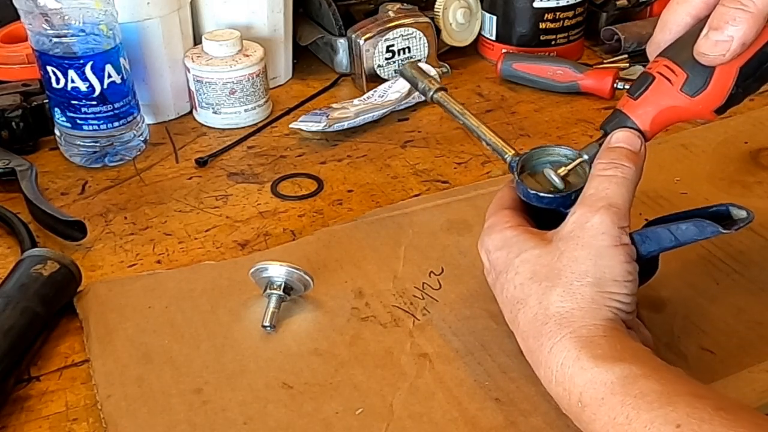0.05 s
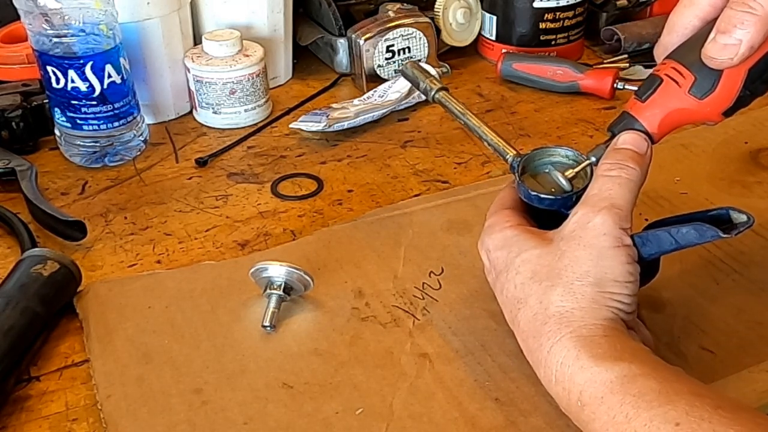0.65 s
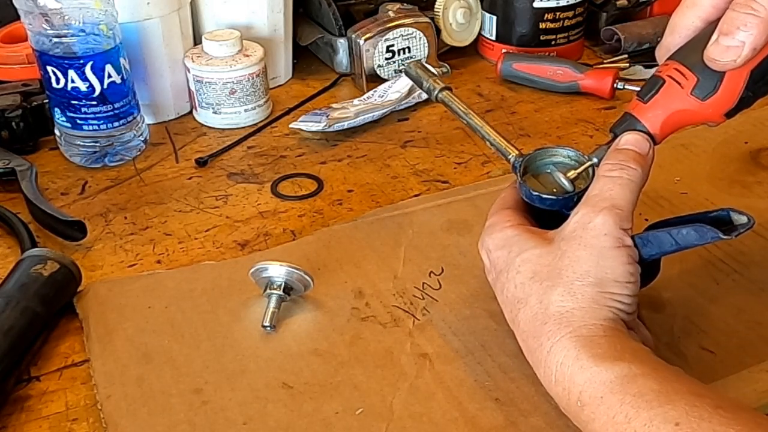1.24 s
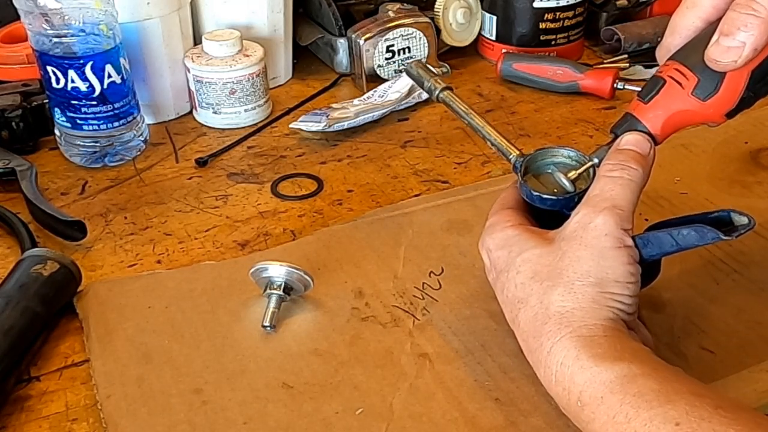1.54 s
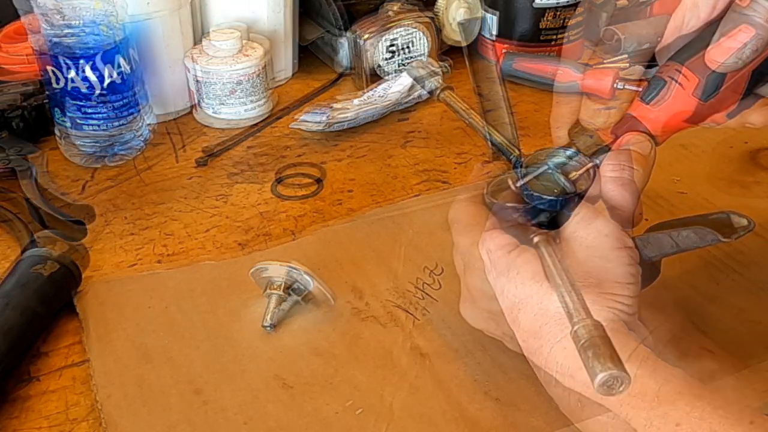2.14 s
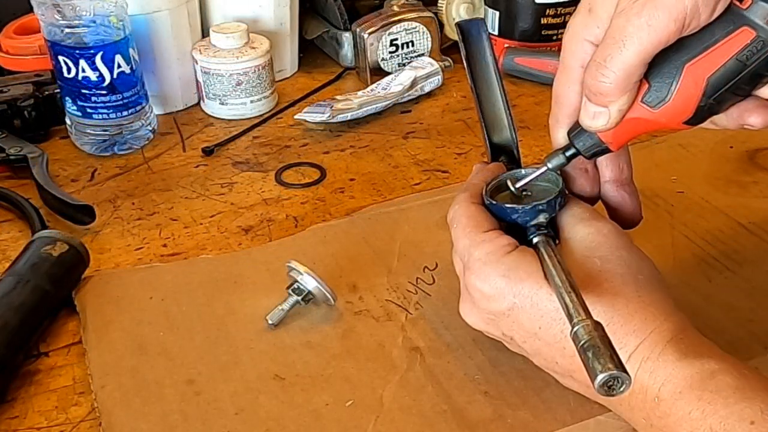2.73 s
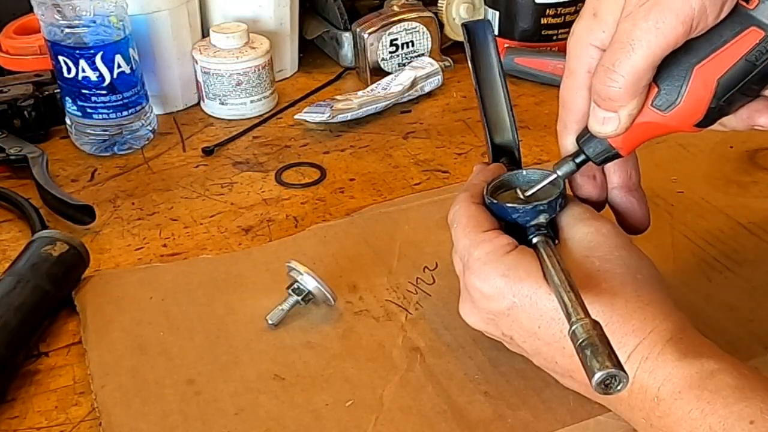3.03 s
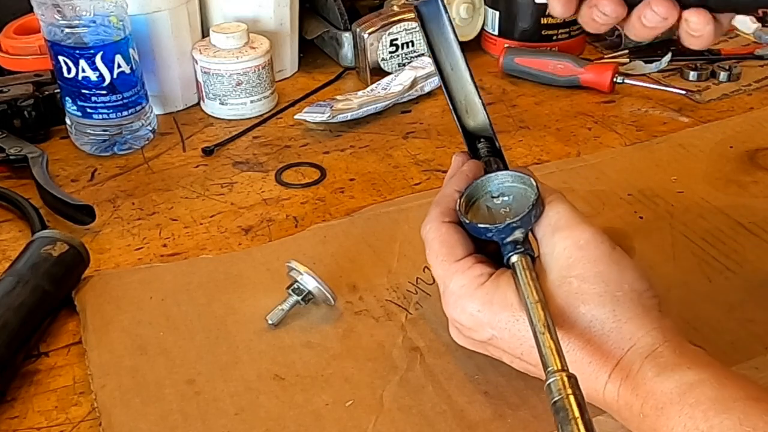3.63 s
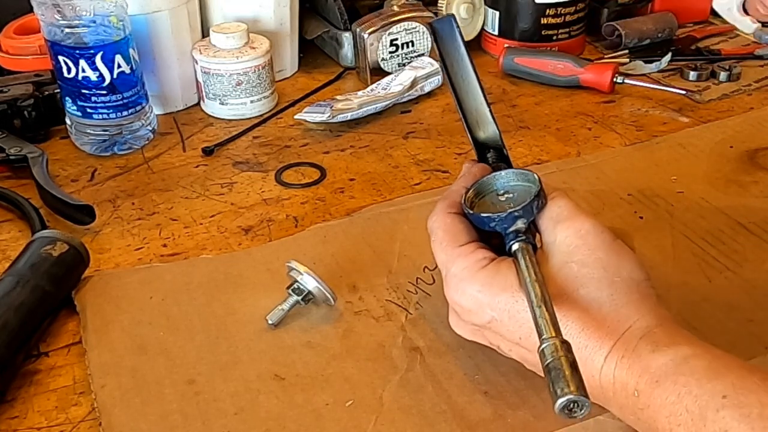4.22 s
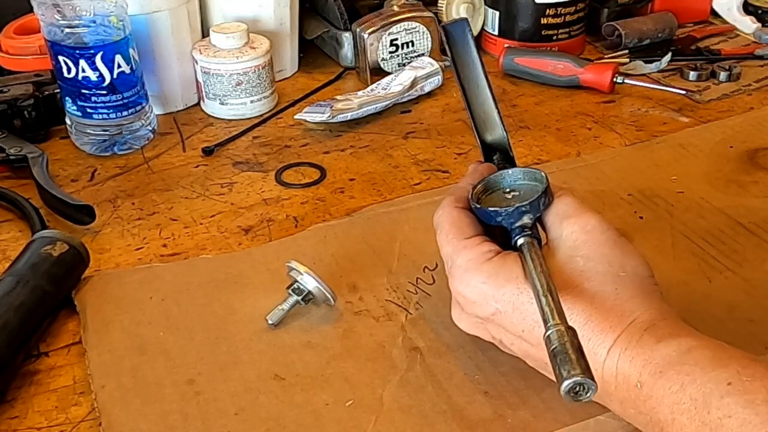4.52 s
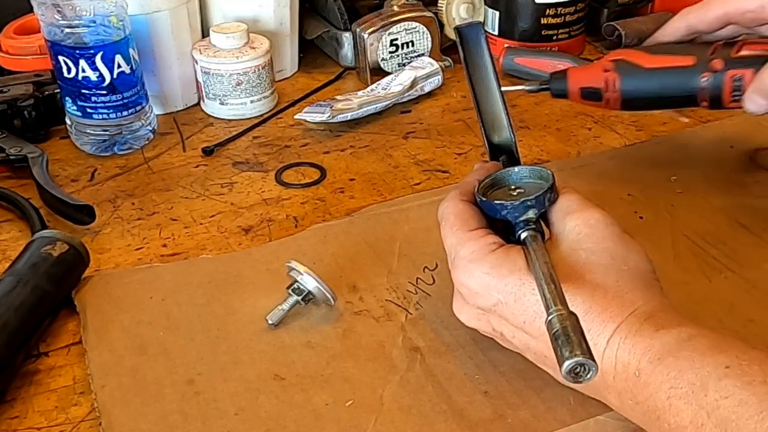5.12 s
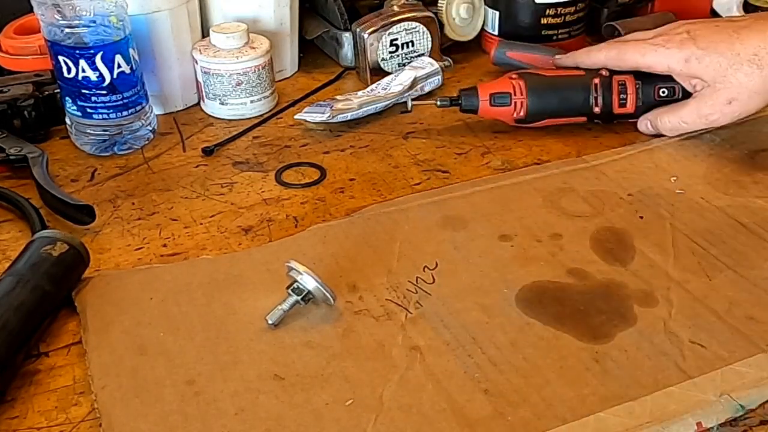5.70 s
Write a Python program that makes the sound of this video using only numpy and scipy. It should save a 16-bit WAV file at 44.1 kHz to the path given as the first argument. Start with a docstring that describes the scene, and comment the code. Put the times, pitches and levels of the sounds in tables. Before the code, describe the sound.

Close by in a quiet workshop, a small rotary tool grinds steel with a gritty, chattering buzz that sags under pressure and squeals against the rim. After about three seconds the grinding stops and the freed motor rises to a high whine. It clicks off and coasts down, then is set on a wooden bench with sharp clacks and a hollow knock, followed by a last brief rasp.

```python
"""A cordless rotary tool skids with a screech, then grinds inside a small steel cup: one blow a turn and
dragged grit excite the cup's modes, and the speed sags under load. This pass fades into a second, in
which the rim squeals. The bit catches and lifts off; the freed motor races up with a whine, is switched
off and coasts down against drag and friction. The tool is put down, its plastic shell clacking and the
wooden workbench ringing, and a last short rasp of grinding sets in."""
import sys
import numpy as np
from scipy import signal
from scipy.fft import rfft, irfft, next_fast_len
from scipy.io import wavfile
from scipy.ndimage import uniform_filter1d, minimum_filter1d

SR = 44100
rng = np.random.default_rng(int(sys.argv[2]) if len(sys.argv) > 2 else 0)


def pcm_store(signal):
    """Save signal as 16-bit PCM."""
    levels = np.round(np.clip(np.atleast_2d(signal), -1, 1) * 32767)
    wavfile.write(sys.argv[1], SR, levels.astype(np.int16).T)


N = 262641
TIME = np.arange(N) / SR
PADDED = next_fast_len(N + 16384, real=True)
BINS = np.maximum(np.arange(PADDED // 2 + 1) * SR / PADDED, 1)  # Hz

SKID_END_S, SKID_BLUR_DB = 0.188, 6  # skidding blurs the blows and the motor's tone
HANDOVER_S, HANDOVER_LENGTH_S = 1.68, 0.88  # the first pass fades into the second
FREE_S, OFF_S = 3.3, 4.95  # the motor is freed of its load, then switched off
TOP_SPEED = 271.4  # turns per second

# The first pass sags as the hand bears down. Each row: time in seconds, speed in turns per second.
FIRST_SPEED = [(0, 244), (.19, 236.3), (.37, 243), (.6, 234), (.77, 219), (.95, 207), (1.42, 195),
               (1.7, 182.8), (2.25, 170)]
# Spectrum of a small click, of rim or switch. Each row: frequency in Hz, relative level in dB.
CLICK_COLOUR = [(400, -41), (1300, -10.5), (2100, -9.5), (4500, -13), (6000, -27), (14000, -44)]
# Resonances of the housing. Each row: frequency in Hz, width in Hz, lift in dB.
HOUSING = [(277, 43, 13.5), (1170, 72, 23), (1600, 170, 8.5), (5430, 770, 15), (7770, 610, 14.5),
           (8550, 160, 26)]
# The tool meets the bench. Each row: time in seconds, relative levels of clack and thud in dB,
# pitch of the clack in Hz, relative level of the crack in dB.
KNOCKS = [(5.498, -6.5, -22, 3500, -34), (5.5003, -2, -19.5, 1000, -32), (5.519, -34, -15, 600, -44),
          (5.5485, -13, -18, 2300, -21), (5.5506, -6, -7, 2270, -10.5), (5.6143, -15, -16.5, 800, -50),
          (5.6241, -6.5, -2, 3120, -21), (5.639, -27, -13, 1200, -50), (5.662, -18, -10.5, 1500, -50)]


def from_db(db):
    """Decibels to amplitude ratio."""
    return 10 ** (np.asarray(db) / 20)


def rms_one(x):
    """Scale so that the mean of the channels has rms 1."""
    return x / np.sqrt(np.mean(np.atleast_2d(x).mean(axis=0) ** 2) + 1e-20)


def in_time(points):
    """Linear interpolation of a curve at every sample."""
    return np.interp(TIME, *np.transpose(points))


def at_bins(points):
    """Interpolation over log frequency at every bin."""
    hz, value = np.transpose(points)
    return np.interp(np.log(BINS), np.log(hz), value)


def ramp(start, length):
    """A linear rise from 0 to 1."""
    return np.clip((TIME - start) / length, 0, 1)


def bump(centre, half_width):
    """A Gaussian swell to 1 and back."""
    return np.exp(-((TIME - centre) / half_width) ** 2)


def drift(rate_hz):
    """Slow random fluctuation: low-passed noise with rms 1."""
    pole = np.exp(-80 * np.pi * rate_hz / SR)
    slow = signal.lfilter([1], [1, -2 * pole, pole * pole], rng.standard_normal(N // 40 + 2002))[2000:]
    return np.interp(np.arange(N) / 40, np.arange(len(slow)), rms_one(slow))


def filtered(x, response):
    """Linear filtering: multiply the spectrum by a frequency response."""
    return irfft(rfft(x, PADDED) * response, PADDED)[..., :N]


def causal(spectrum):
    """The minimum-phase response of a body with this spectrum: it rings only after the blow."""
    cepstrum = irfft(np.log(from_db(at_bins(spectrum))), PADDED)
    cepstrum[1:PADDED // 2] *= 2
    cepstrum[PADDED // 2 + 1:] = 0
    return np.exp(rfft(cepstrum))


def resonator(hz, width):
    """Frequency response of one damped mode."""
    return 1 / (1 + 2j * (BINS - hz) / width)


def lift_db(resonances, hz):
    """Lorentzian peaks: how much a set of resonances raises this frequency."""
    return sum(db / (1 + (2 * (hz - centre) / width) ** 2) for centre, width, db in resonances)


def scatter(t60):
    """Response of a diffuse tail: noise in exponential decay, with unit energy."""
    tail = rng.standard_normal(N) * from_db(-60 * np.minimum(TIME / t60, 2))
    return rfft(tail / np.linalg.norm(tail), PADDED)


def clicks(times, sizes):
    """Impulses, each shared between its two nearest samples."""
    at = np.clip(np.asarray(times) * SR, 0, N - 2)
    whole = at.astype(int)
    fraction = at - whole
    return np.bincount(whole, sizes * (1 - fraction), N) + np.bincount(whole + 1, sizes * fraction, N)


def noise(spectrum):
    """Coloured noise with rms 1."""
    return rms_one(filtered(rng.standard_normal(N), from_db(at_bins(spectrum))))


def workshop():
    """Background noise: a low rumble, which dips for a while, and a steady hiss."""
    # Spectra of the quiet room. Each row: frequency in Hz, relative level in dB.
    rumble_colour = [(20, -28), (42, 8.5), (90, -1.5), (160, -27), (300, -12.5), (600, -68)]
    hiss_colour = [(150, -10), (600, -23), (1260, -8.5), (2400, -16.5), (14000, -50)]
    rumble = noise(rumble_colour) * from_db(-38.5 - 7.5 * bump(2.6, 1))
    return rumble + noise(hiss_colour) * from_db(-44.5)


def skid():
    """1 while the bit skids, then 0."""
    return 1 - ramp(SKID_END_S, 0.029)


def load():
    """Load slows a motor: 0 at the highest speed of the first pass, 1 at its lowest."""
    speed = in_time(FIRST_SPEED)
    return (speed.max() - speed) / np.ptp(speed)


def screech():
    """Stick-slip friction drives the rim's high modes in uneven bursts that grow until the bit grips."""
    # High modes of the rim. Each row: frequency in Hz, width in Hz, level at the skid's end in dB.
    rim_modes = [(6840, 470, -23), (8150, 550, -19.5), (11200, 260, -31)]
    rise_db_per_s = 44
    hiss_band = 1 / (1 + (5000 / BINS) ** 8) / (1 + (BINS / 12000) ** 4)
    out = rms_one(filtered(rng.standard_normal(N), hiss_band)) * from_db(-30 + 1.8 * drift(45))
    for hz, width, db in rim_modes:
        mode = rms_one(filtered(rng.standard_normal(N), resonator(hz, width) ** 2))
        out = out + mode * from_db(db + 2.6 * drift(38))
    return out * skid() * from_db(rise_db_per_s * np.minimum(TIME - SKID_END_S, 0))


def grinding_pass(speed, blow_colour, grit_colour, blows_over_grit_db, bounce,
                  jitter_s, uneven, gating_db, smear, spot_size, spots=6):
    """Periodic impact: the bit strikes the cup once a turn and drags grit over it after each blow."""
    # High modes of the cup, rung by the grit. Each row: frequency in Hz, width in Hz, lift in dB.
    cup_modes = [(3880, 140, 3.5), (4750, 450, 4), (8470, 230, 11), (9430, 92, 10)]
    turns = np.cumsum(in_time(speed) * (1 + 0.0012 * drift(18.4))) / SR
    k = np.arange(1, int(turns[-1]))
    blow_times = np.interp(k, turns, TIME)
    # period doubling: a bouncing bit lands hard and soft in turn
    sizes = 1 + np.interp(blow_times, TIME, bounce) * (-1) ** k
    sizes *= 1 + uneven * rng.standard_normal(len(k))
    late = jitter_s * rng.standard_normal(len(k))
    blows = clicks(blow_times + late, sizes)
    # smaller high spots round the bit touch at their own, wandering angles: uneven overtones
    for offset in rng.random(spots):
        wander = .003 * np.interp(k, turns, drift(3.4))
        spot_times = np.interp(k + offset + wander, turns, TIME)
        blows = blows + spot_size * drift(2.5) * clicks(spot_times + late, sizes)
    # bending waves in steel are dispersive: the lows arrive later
    dispersion = np.exp(-2j * np.pi * smear * np.sqrt(BINS))
    blows = rms_one(filtered(blows, causal(blow_colour) * dispersion))
    grit = rng.standard_normal(N) * from_db(gating_db * np.cos(2 * np.pi * (turns - .3)) + drift(200))
    # the cup's many narrow modes ring on after each grain
    cup = causal(grit_colour) * from_db(lift_db(cup_modes, BINS)) * (1 + 0.24 * scatter(0.13))
    grit = rms_one(filtered(grit, cup))
    regular = from_db(blows_over_grit_db)
    return (regular * blows + grit) / np.sqrt(1 + regular ** 2)


def first_pass():
    """Under rising load the regular blows sink into the grit and the bit begins to bounce."""
    # Spectra of the blows and of the grit. Each row: frequency in Hz, relative level in dB.
    blow_colour = [(120, -31.5), (235, -21), (400, -13), (590, -2.5), (710, -0.5), (850, -9), (1100, 1.5),
                   (1320, -6), (1570, -6.5), (2000, -4.5), (2750, -14.5), (4800, -13), (7000, -44.5)]
    grit_colour = [(100, -23), (400, -18), (740, -6.5), (1160, 3), (1550, -5.5), (2150, -1), (2800, -6),
                   (3400, -1), (3900, -2), (4350, -10.5), (4850, -5), (5800, -14), (7500, -12),
                   (8200, -14.5), (10500, -23.5), (15000, -41)]
    blows_over_grit_db = 3 - 9.5 * load() - SKID_BLUR_DB * skid()
    bounce = 0.43 * np.clip((load() - 0.3) / 0.2, 0, 1)
    return grinding_pass(FIRST_SPEED, blow_colour, grit_colour, blows_over_grit_db, bounce,
                         jitter_s=.000017, uneven=0.012, gating_db=2.2, smear=.3, spot_size=0.44)


def grinding():
    """Contact force, from load and hand pressure, sets how much the cup rings, rasps and hisses."""
    # The ring, rasp and hiss bands. Each row: level at light touch, at full load and in the second
    # pass, lift in the skid, flutter, all in dB.
    bands = [(-17.5, -21, -24.5, -1.5, 0.5), (-16, -18, -17, -2, 1.15), (-28, -31, -34.5, 0, 0.1)]
    # The hand presses or eases. Each row: centre and half-width in seconds, ring, rasp, hiss lift in dB.
    presses = [(0.236, 0.033, -4, -3.5, -2), (0.37, 0.19, -3, -4.5, -4), (2.633, 0.051, -4.5, -3.5, -3.5),
               (2.732, 0.16, 3, 5.5, 4), (3.01, 0.035, 4.5, -0.5, 2.5), (3.112, 0.25, -0.5, 5, 1)]
    fade_s, fade_db_per_s, lift_off_s = 3.16, 41, 3.305
    effort, skidding, share = load(), skid(), ramp(HANDOVER_S, HANDOVER_LENGTH_S)
    contact = np.sqrt(1 - share) * first_pass() + np.sqrt(share) * second_pass()
    contact = ports(contact + squeals(contact))
    contact *= from_db(0.12 * drift(27))  # the hand-held bit chatters unevenly
    low, high = 1 / (1 + (BINS / 1500) ** 12), 1 / (1 + (6000 / BINS) ** 12)
    presses_db = sum(np.outer(band_db, bump(s, half_width)) for s, half_width, *band_db in presses)
    out = 0
    for response, press_db, band in zip((low, 1 - low - high, high), presses_db, bands):
        light_db, loaded_db, second_db, skid_db, flutter_db = band
        first_db = light_db + (loaded_db - light_db) * effort + skid_db * skidding
        level_db = (1 - share) * first_db + share * second_db + press_db
        part = filtered(contact, response)
        power = uniform_filter1d(part.mean(axis=0) ** 2, size=4000)
        out = out + part / np.sqrt(power + 1e-12) * from_db(level_db + flutter_db * drift(13.2))
    return out * from_db(-fade_db_per_s * np.maximum(TIME - fade_s, 0)) * (1 - ramp(lift_off_s, 0.023))


def unbalance():
    """Forced vibration: the off-centre bit shakes the tool once a turn; load damps the overtones."""
    # Overtones that sing under a light touch. Each row: multiple of the speed, relative level in dB.
    overtones = [(4, 0), (8, -20), (9, -10.5), (13, -8.5), (15, -11), (17, -11.5)]
    speed = in_time(FIRST_SPEED)
    angle = 2 * np.pi * np.cumsum(speed) / SR
    shake = from_db(-32.5) * np.sin(angle) * (speed / speed.max()) ** 9
    tone = sum(from_db(db + 0.99 * drift(32)) * np.sin(k * angle) for k, db in overtones)
    tone *= from_db(-17 - 17 * load() - SKID_BLUR_DB * skid())
    return (shake + tone) * (1 - ramp(HANDOVER_S, HANDOVER_LENGTH_S))


def growl():
    """Impulse excitation: pressed hard, the bit hops every turn or two and rings the cup's low modes."""
    # Spells of hopping. Each row: centre and half-width in seconds, turns per hop, relative levels
    # of the low, middle and high mode in dB.
    spells = [(.59, .04, 2, -25, -30, -32), (.74, .07, 1, -26, -22, -25), (.89, .035, 1, -22, -21, -36),
              (1.06, .09, 2, -27, -28, -30), (1.3, .1, 2, -22, -29, -42), (1.55, .05, 2, -26, -28, -31),
              (1.8, .14, 1, -23, -25, -38)]
    modes_hz, width_hz = (1059, 1312, 1567), 110
    uneven_db, jitter_s = 2.5, .00005
    speed = in_time(FIRST_SPEED)
    turns = np.cumsum(speed) / SR
    out = 0
    for s, half_width, stride, *levels_db in spells:
        times = np.interp(np.arange(stride, turns[-1], stride), turns, TIME)
        samples_per_hop = stride * SR / np.interp(times, TIME, speed)
        sizes = samples_per_hop * from_db(uneven_db * rng.standard_normal(len(times)))
        hops = clicks(times + jitter_s * rng.standard_normal(len(times)), sizes) * bump(s, half_width)
        cup = sum(from_db(db) * resonator(hz, width_hz) ** 2 for hz, db in zip(modes_hz, levels_db))
        out = out + filtered(hops, cup)
    return out


def second_pass():
    """Slower periodic blows stand clear of the grit, then break up as the bit slips off the work."""
    # Rotation of the bit. Each row: time in seconds, speed in turns per second.
    speed = [(2.166, 114), (2.4, 129.5), (2.49, 134), (2.62, 135.3), (2.85, 132), (3.08, 122), (3.3, 113)]
    # Spectra of the blows and of the grit. Each row: frequency in Hz, relative level in dB.
    blow_colour = [(130, -47), (265, -23.5), (400, -24.5), (690, -14.5), (830, -7.5), (1080, -3.5),
                   (1270, -3.5), (1450, -18.5), (2080, -5.5), (2280, -11.5), (2550, -11), (3080, -17),
                   (3350, -6.5), (3750, -4.5), (4400, -12.5), (5800, -23), (10000, -56.5)]
    grit_colour = [(100, -48), (450, -16), (640, -12), (850, -0.5), (1300, -5), (1600, -14), (2300, -4.5),
                   (3050, -4.5), (3550, 1.5), (4500, -13), (6500, -15.5), (8600, -20), (12000, -26),
                   (15000, -36)]
    slip_s, breakup_db_per_s = 3.064, 147
    blows_over_grit_db = 9 - breakup_db_per_s * np.maximum(TIME - slip_s, 0)
    return grinding_pass(speed, blow_colour, grit_colour, blows_over_grit_db, bounce=np.zeros(N),
                         jitter_s=.000008, uneven=0.05, gating_db=4.2, smear=.9, spot_size=0.3)


def squeals(contact):
    """Resonance: while the bit rides on the rim, narrow modes amplify the grinding and flutter."""
    # Rim squeals. Each row: frequency and width in Hz, centre and half-width in seconds, relative gain.
    rim_squeals = [(1288, 59, 2.33, 1, 1.5), (2410, 71, 2.23, 0.19, 2.3), (4370, 130, 2.45, 0.066, 3.1),
                   (2140, 110, 2.72, 0.19, 1.75), (2790, 76, 2.95, 0.042, 2.5), (2474, 98, 3.15, 0.18, 3.6)]
    out = 0
    for hz, width, s, half_width, gain in rim_squeals:
        swell = gain * bump(s, half_width) * from_db(0.5 * drift(19))
        out = out + swell * filtered(contact, resonator(hz, width))
    return out


def clacks(touches, spectrum, t60, tail_db, tail_t60):
    """Impact and reverberation: parts chatter after each touch (seconds, dB) and the room answers."""
    times, levels_db = np.transpose(touches)
    body = causal(spectrum)
    body /= np.sqrt(np.mean(np.abs(body) ** 2))
    decay = scatter(t60) + from_db(tail_db) * scatter(tail_t60)
    return filtered(clicks(times, from_db(levels_db)), 6 * body * decay)


def rim_catches():
    """Two quick impacts: the bit catches on the rim as it leaves."""
    # The catches. Each row: time in seconds, relative level in dB.
    touches = [(3.2555, -3), (3.2605, -4.5)]
    return clacks(touches, CLICK_COLOUR, t60=0.0083, tail_db=-21, tail_t60=0.098)


def free_speed():
    """Unloaded, the speed nears its top exponentially; with the current off, drag and friction brake."""
    start_speed, spin_up_s = 168.7, .342
    drag_per_s, friction = 1.3, 52  # friction in turns per second lost each second
    driven_s = np.clip(TIME, FREE_S, OFF_S) - FREE_S
    running = TOP_SPEED - (TOP_SPEED - start_speed) * np.exp(-driven_s / spin_up_s)
    kept = np.exp(-drag_per_s * np.maximum(TIME - OFF_S, 0))
    return np.maximum(running * kept - friction / drag_per_s * (1 - kept), 1)


def shaft_lines(speed, angle, octaves, coasting):
    """Rotational orders of shaft and bearings grow with speed and swell at the housing's resonances."""
    # Shaft and bearing lines. Each row: multiple of the speed, relative level in dB.
    orders = [(1, -21.5), (2, -16), (3, -16.5), (6, -13.5), (7, -18), (8, -14), (11, -13), (13, -14),
              (18, -17), (24, -15), (26.4, -21), (30.8, -16.5), (31.6, -27.5), (35.2, -17)]
    # Lines that fall through a resonance while coasting. Each row: multiple of the speed,
    # centre and half-width in Hz, level in dB.
    swells = [(6, 1170, 320, -36), (9, 1703, 77, -29.5), (9, 1390, 180, -31.5), (12, 2214, 88, -28)]
    shaft = angle + 0.027 * drift(27)
    lines = sum(from_db(db + 2.9 * drift(25)) * np.sin(k * shaft) for k, db in orders)
    lines = filtered(lines, from_db(lift_db(HOUSING, BINS)))
    lines *= from_db(-29 + 27.5 * octaves - 5 * coasting)
    for k, hz, half_width, db in swells:
        swell = np.exp(-((k * speed - hz) / half_width) ** 2) * coasting
        lines += swell * from_db(db + 4.4 * drift(21)) * np.sin(k * angle)
    return lines


def commutator_whine(speed, angle, coasting):
    """A swept excitation: the commutator's twelve-a-turn tone crosses the motor can's resonances."""
    # Peaks and notches of the can. Each row: frequency in Hz, width in Hz, lift in dB.
    can_resonances = [(2600, 600, 17), (2814, 60, -8), (2950, 340, 12.5), (3127, 24, -10),
                      (3180, 200, 18.5)]
    level_db = -50 + lift_db(can_resonances, 12 * speed) + 4 * coasting + 1.76 * drift(23)
    return np.sqrt(2) * np.sin(12 * angle) * from_db(level_db)


def sinking_tone(speed, angle, coasting):
    """A tone sings, sinking as the speed rises, with sidebands at multiples of the speed."""
    # The tone and its sidebands. Each row: offset in multiples of the speed, relative level in dB.
    sidebands = [(0, -2), (2, -12), (5, -6.5)]
    pitch_hz = 1127 + 3.6 * (TOP_SPEED - speed) * (1 - coasting)
    phase = 2 * np.pi * np.cumsum(pitch_hz + 4 * drift(48.7)) / SR
    tone = sum(from_db(db) * np.sin(phase + k * angle) for k, db in sidebands)
    return tone * from_db(-31) * (1 - coasting)


def cooling_air(angle, octaves):
    """Flow noise pulses slightly once a turn and grows with speed."""
    # Spectrum of the air. Each row: frequency in Hz, relative level in dB.
    air_colour = [(150, -14), (480, -18.5), (800, -15.5), (1100, -1), (1400, -10.5), (2500, -8),
                  (3200, -9.5), (4200, -12), (7000, -20.5), (8500, -12.5), (11000, -32), (15000, -40)]
    flow = rng.standard_normal(N) * from_db(0.5 * np.cos(angle))
    return rms_one(filtered(flow, causal(air_colour))) * from_db(-29 + 8 * octaves)


def brushes(angle, octaves, top_hz=10400):
    """The brushes add high harmonics, each wavering on its own, coloured by the housing's resonances."""
    cluster = sum(from_db(3.5 * drift(12)) * np.sin(k * angle + drift(14)) for k in range(20, 56))
    response = from_db(lift_db(HOUSING, BINS) / 2) / (1 + (BINS / top_hz) ** 10)
    return filtered(cluster, response) * from_db(-52.5 + 6 * octaves)


def motor():
    """Rotating machinery: every sound of the free motor follows the speed of one shaft."""
    speed = free_speed()
    octaves = np.log2(speed / TOP_SPEED)
    coasting = ramp(OFF_S, 0.12)
    angle = 2 * np.pi * np.cumsum(speed * (1 + 0.0012 * drift(26.0))) / SR
    out = shaft_lines(speed, angle, octaves, coasting) + commutator_whine(speed, angle, coasting)
    out += sinking_tone(speed, angle, coasting) + cooling_air(angle, octaves) + brushes(angle, octaves)
    return out * ramp(3.27, 0.04) * from_db(-30 * ramp(5.5, 0.086))  # fades as the tool is put down


def controller(chop_hz=1940):
    """Chopping the motor current at a fixed rate gives a whistle whose pitch ignores the speed."""
    # Harmonics of the whistle. Each row: multiple of the chopping rate, level in dB.
    harmonics = [(1, -37.5), (3, -42)]
    phase = 2 * np.pi * chop_hz * TIME
    tones = sum(from_db(db + 3.44 * drift(4.7)) * np.sin(k * phase) for k, db in harmonics)
    return tones * ramp(FREE_S, 0.15) * (1 - ramp(OFF_S, .01))


def switch():
    """One heavily damped impact of plastic turns the tool off."""
    # The click. Each row: time in seconds, relative level in dB.
    touches = [(4.9455, -1)]
    return clacks(touches, CLICK_COLOUR, t60=0.0074, tail_db=-19, tail_t60=0.14)


def shell_clacks():
    """Each struck part of the plastic shell stresses its own broad resonance, and hard edges crack."""
    # Spectra of the shell and of its edges. Each row: frequency in Hz, relative level in dB.
    clack_colour = [(150, -28), (450, -14), (1050, -3.5), (1600, -13), (2300, -1), (3400, -7.5),
                    (5000, -14), (9000, -24.5), (15000, -45)]
    crack_colour = [(1000, -31), (3000, 2), (5500, 2), (8800, -6), (15000, -33)]
    peak_db, relative_width = 9.5, 0.35
    shell = 0
    for s, db, _, hz, _ in KNOCKS:
        clack = clacks([(s, db)], clack_colour, t60=0.016, tail_db=-12.5, tail_t60=0.57)
        resonance_db = lift_db([(hz, relative_width * hz, peak_db)], BINS) - peak_db / 2
        shell = shell + filtered(clack, from_db(resonance_db))
    edges = [(s, db) for s, *_, db in KNOCKS]
    return shell + clacks(edges, crack_colour, t60=0.011, tail_db=-7.0, tail_t60=0.72)


def bench():
    """Modal response of the heavy bench top: dense upper modes knock hollowly, low ones boom."""
    # Spectrum of the upper modes. Each row: frequency in Hz, relative level in dB.
    wood_colour = [(150, -4.5), (450, 1.5), (1000, -4), (1600, -3), (3000, -17), (12000, -57)]
    # Low modes, with the tool on top. Each row: frequency in Hz, relative level in dB, t60 in seconds.
    low_modes = [(84, -14, 0.26), (122, -6.5, 0.12), (139.8, -5.5, 0.21), (167.4, -5.5, 0.26),
                 (225, -3, 0.13), (275, -23, 0.37), (330, -13, 0.12), (447, -25, 0.13), (670, -11, 0.038)]
    times, _, thud_db, *_ = np.transpose(KNOCKS)
    wood = clacks(list(zip(times, thud_db - 2)), wood_colour, t60=0.081, tail_db=-5.0, tail_t60=0.41)
    t = np.arange(SR // 2) / SR
    ring = sum(from_db(db - 60 * t / t60) * np.sin(2 * np.pi * hz * t) for hz, db, t60 in low_modes)
    ring *= 1 - np.exp(-t / 0.0033)
    boom = rfft(ring, PADDED) * (1 + from_db(-3.5) * scatter(0.39))
    return wood + filtered(clicks(times, -from_db(thud_db)), boom)


def bit_ring(start_s=5.551):
    """Free vibration: a knock leaves the bit's modes decaying exponentially."""
    # Modes of the bit. Each row: frequency in Hz, level in dB, t60 in seconds.
    bit_modes = [(2190, -28.5, 0.57), (2280, -33, 0.31), (5884, -30, 0.17)]
    t = np.maximum(TIME - start_s, 0)
    return sum(from_db(db - 60 * t / t60) * np.sin(2 * np.pi * hz * t) for hz, db, t60 in bit_modes)


def last_rasp(start_s=5.902, attack_s=.022):
    """Grinding sets in again as broadband noise, roughened by fast amplitude modulation."""
    # Spectrum of the rasp. Each row: frequency in Hz, relative level in dB.
    rasp_colour = [(100, -13), (500, -4), (1100, -10), (2300, 1.5), (4000, -8.5), (7000, -23), (10000, -18),
                   (15000, -40)]
    return noise(rasp_colour) * from_db(-13 + 1.9 * drift(128.6)) * ramp(start_s, attack_s) ** 2


def ports(x):
    """Left and right differ in level and phase, and the treble sounds wider and more diffuse."""
    # How the two channels differ. Each row: frequency in Hz, coherence, left over right in dB,
    # lag of the left in radians.
    differences = [(100, 1, 1, 0.34), (517, 0.86, -2.5, 0.067), (1310, 1, -2, 0.69), (2340, 0.67, 1, 0.47),
                   (4030, 0.76, -1, 1.21), (8050, 0.66, -3, 2.16), (13900, 0.12, -4, 1.64)]
    hz, *columns = np.transpose(differences)
    coherence, balance_db, lag = (np.interp(np.log(BINS), np.log(hz), c) for c in columns)
    coherence = np.clip(coherence, 0, .998)
    sides = np.array([[1], [-1]])
    field = np.sqrt((1 + coherence) / 2) + sides * np.sqrt((1 - coherence) / 2) * scatter(0.087)
    return filtered(x, field * from_db(sides * balance_db / 2) * np.exp(-.5j * sides * lag))


def scene():
    """Superposition: grinding, free run, switch and knocks add over the quiet of the workshop."""
    brief_sounds = switch() + rim_catches() + last_rasp()
    background = workshop()
    cup = grinding()  # already in stereo
    tool = screech() + growl() + motor() + controller() + unbalance()
    put_down = shell_clacks() + bench() + bit_ring()
    return cup + ports(tool + put_down + brief_sounds + background)


def record(dry):
    """A quick limiter turns the gain down smoothly around peaks, and a low-pass filter cuts the top."""
    ceiling, window_s, cutoff_hz = .98, .002, 15400
    size = int(window_s * SR)
    allowed = ceiling / np.maximum(np.abs(dry).max(axis=0), ceiling)
    gain = uniform_filter1d(minimum_filter1d(allowed, size=size), size=size)
    return signal.sosfilt(signal.ellip(10, .1, 90, cutoff_hz, fs=SR, output="sos"), dry * gain)


dry = scene()
out = record(dry)
pcm_store(out)
```